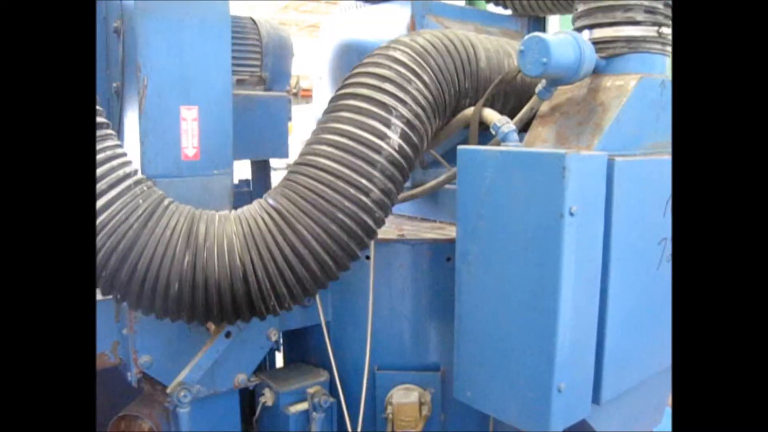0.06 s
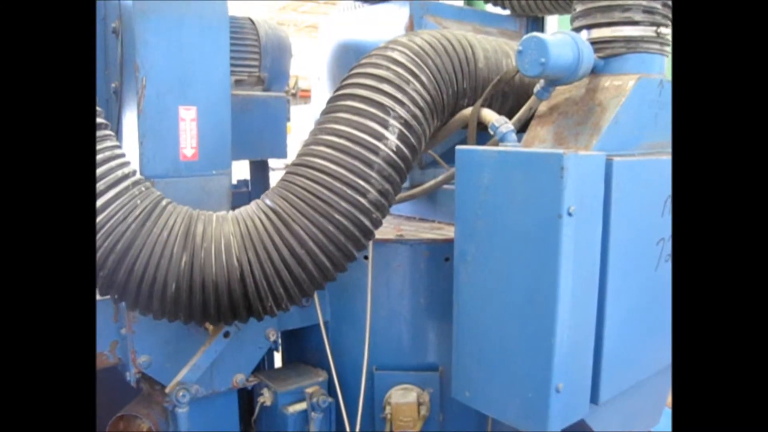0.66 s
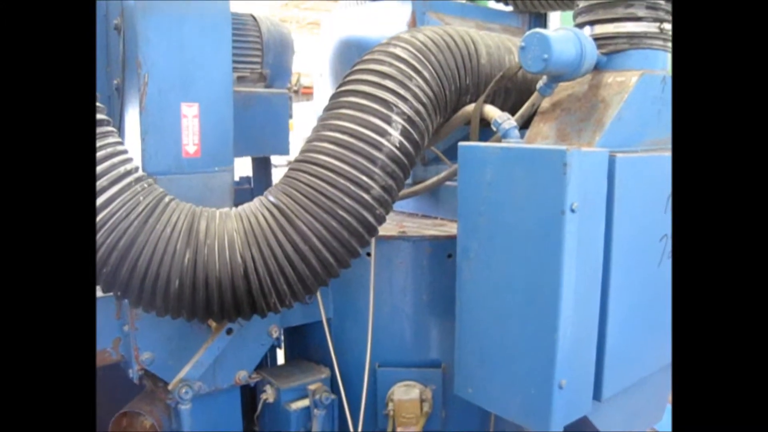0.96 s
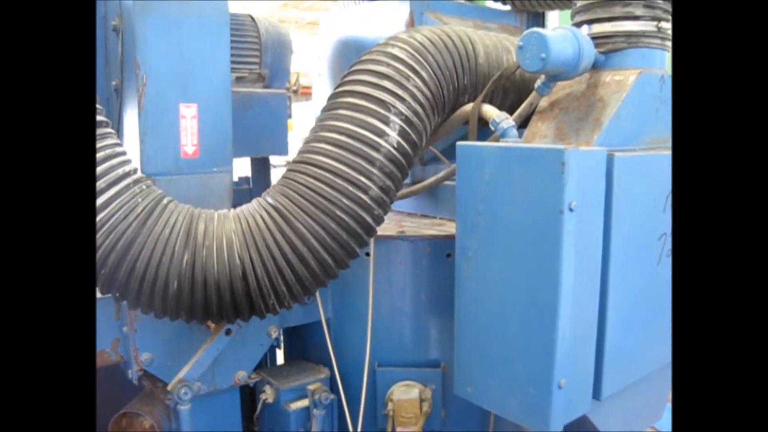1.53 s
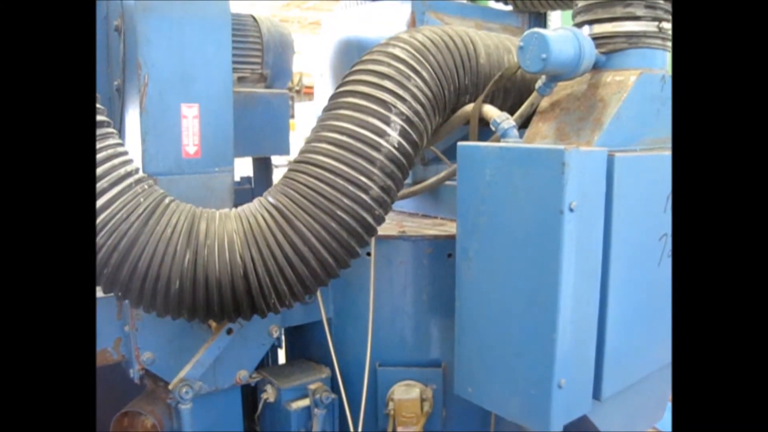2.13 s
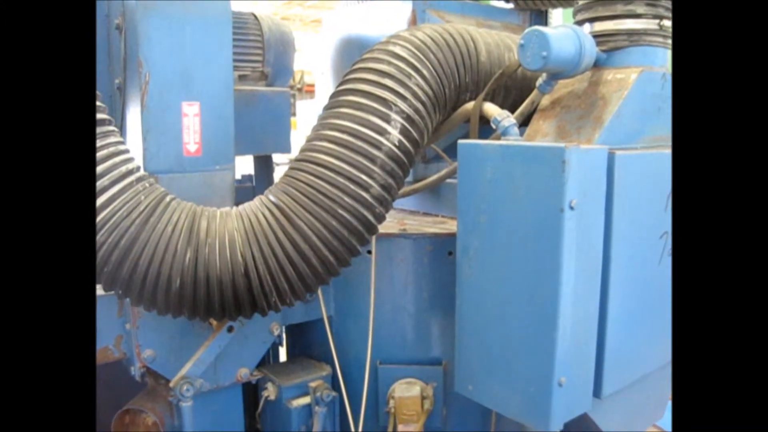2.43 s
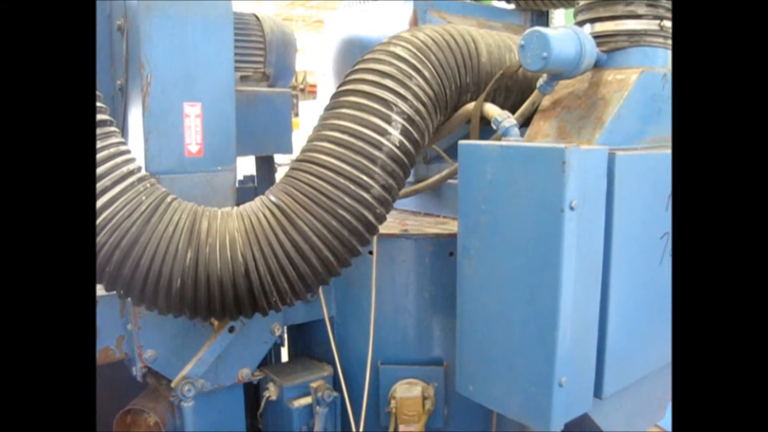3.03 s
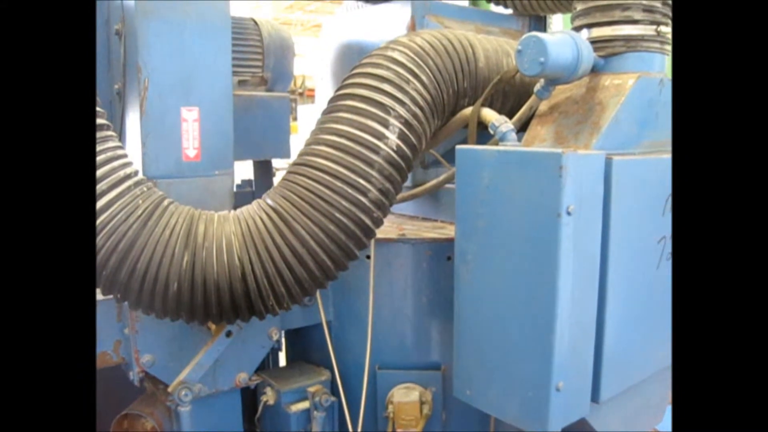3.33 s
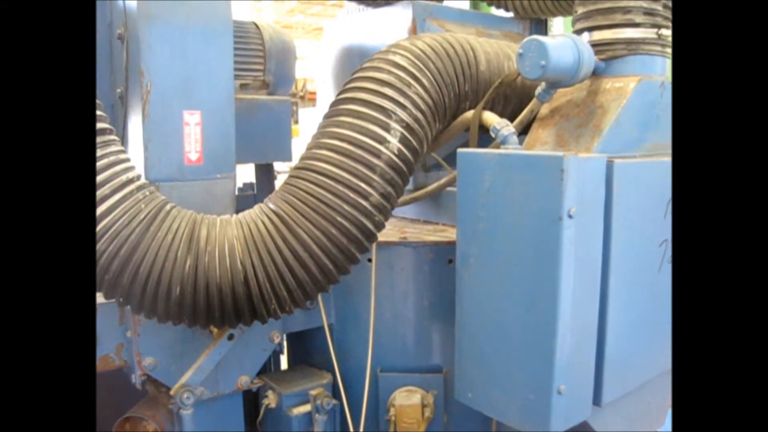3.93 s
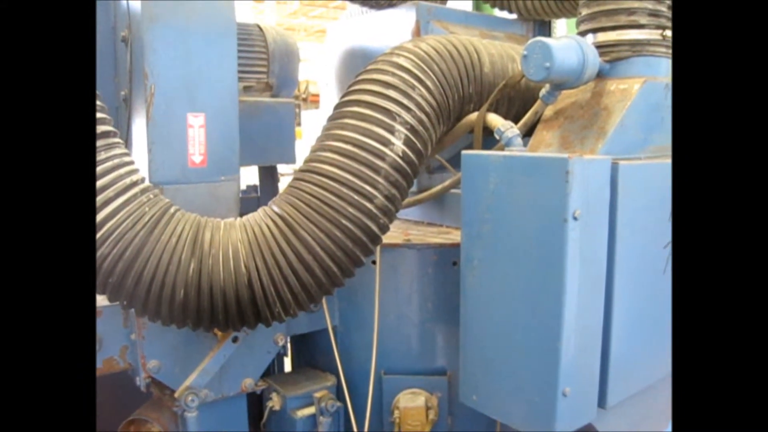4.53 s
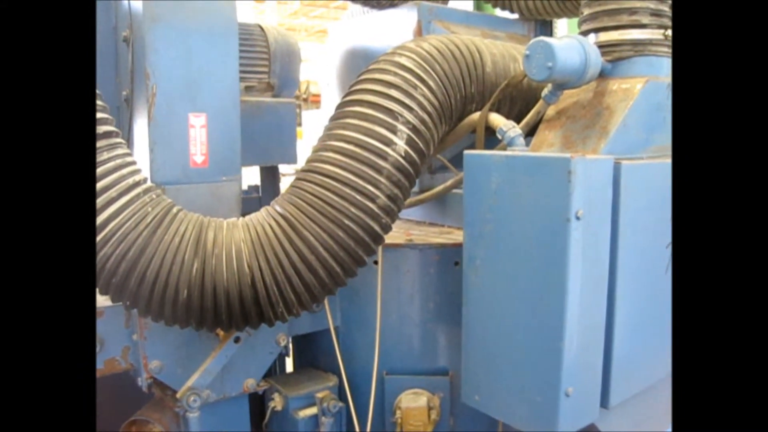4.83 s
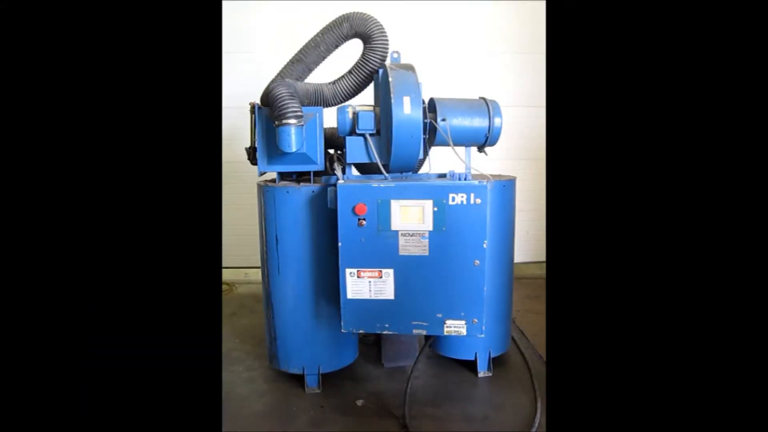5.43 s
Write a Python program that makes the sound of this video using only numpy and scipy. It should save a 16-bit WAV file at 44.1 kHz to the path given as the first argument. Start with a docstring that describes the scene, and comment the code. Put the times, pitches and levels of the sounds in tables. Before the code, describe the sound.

Loud, steady air roar from a plant dryer, booming through a ribbed hose over humming, whining motors, broken by two brief silences.

```python
"""An industrial dryer roars in a plant hall, heard from three standpoints with short silences between.
Its blower drives turbulent air through a ribbed hose that booms at two resonances near 300 and 340 Hz.
In the long middle stretch, beside the hose, the casing rings, motors hum and whine, a thin metallic
singing swells twice, one low gust passes and a faint squeak slides down."""
import sys
import numpy as np
from scipy import signal
from scipy.fft import next_fast_len
from scipy.io import wavfile

SR = 44100
rng = np.random.default_rng(int(sys.argv[2]) if len(sys.argv) > 2 else 0)


def inscribe(sig):
    """Save sig as 16-bit PCM at rate SR to the path in sys.argv[1].

    A 1-D sig is mono; a 2-D sig holds one channel per row.
    Samples are clipped to [-1, 1] before scaling.
    """
    pcm = np.round(np.clip(np.atleast_2d(sig).T, -1, 1) * 32767)
    wavfile.write(sys.argv[1], SR, pcm.astype(np.int16))


N = 245637

# hose resonances: (pitch [Hz], pitch wander [Hz])
LOW_RESONANCE = (303.8, 3.06)
HIGH_RESONANCE = (343, 5.5)
# swells of the metallic singing:
# (crest time [s], hold [s], relative singing level [dB], squeal level [dB], whistle level [dB])
SWELLS = [(1.76, .2, -7, -42, -58.5), (3.971, 0.21, -3, -42, -47.5)]
SWELL_RISE_S, SWELL_FALL_S = .14, .15


def gain_of(db):
    """Decibels to amplitude."""
    return 10 ** (np.asarray(db) / 20)


def seconds():
    """Time of every sample."""
    return np.arange(N) / SR


def follow(rows, column=1):
    """One column of an automation curve at every sample."""
    rows = np.asarray(rows)
    return np.interp(seconds(), rows[:, 0], rows[:, column])


def gate(start, end):
    """Opens and closes within a millisecond."""
    t = seconds()
    return np.sin(np.pi / 2 * np.clip(np.minimum(t - start, end - t) / .001, 0, 1)) ** 2


def envelope(crest_s, hold_s, rise_s, fall_s):
    """Rises smoothly to one at the crest, holds, and dies away."""
    age = seconds() - crest_s
    return np.exp(-(np.minimum(age, 0) / rise_s) ** 2 - (np.maximum(age - hold_s, 0) / fall_s) ** 2)


def swelling_db(rest_db, column):
    """A resting level that rises, in each swell, to the level in the given column."""
    lifts = ((row[column] - rest_db) * envelope(*row[:2], SWELL_RISE_S, SWELL_FALL_S) for row in SWELLS)
    return rest_db + sum(lifts)


def noise(shape):
    """Noise of rms one whose amplitude spectrum follows shape(Hz)."""
    size = next_fast_len(N)
    hz = np.fft.rfftfreq(size, 1 / SR)
    real, imaginary = rng.standard_normal((2, len(hz)))
    sound = np.fft.ifft((real + 1j * imaginary) * shape(hz), size)[:N].real
    return sound / sound.std()


def rush(points):
    """Turbulent noise of rms one, coloured by (Hz, dB) points."""
    pitches, db = np.transpose(points)
    return noise(lambda hz: gain_of(np.interp(np.log(hz + 1), np.log(pitches), db)))


def drift(rate_hz):
    """Smooth random modulation of rms one."""
    return noise(lambda hz: np.exp(-(hz / rate_hz) ** 2))


def ringing(modes):
    """Turbulence ringing in steep-sided resonances."""
    return sum(gain_of(db) * noise(lambda hz: 1 / (1 + ((hz - centre) / width) ** 2))
               for centre, width, db in modes)


def tones(lines, waver_db, waver_hz, wander):
    """Machine tones that waver separately in level and wander together in pitch."""
    clock = np.cumsum(1 + wander * drift(2.48)) / SR
    sound = np.zeros(N)
    for hz, db in lines:
        amplitude = np.sqrt(2) * gain_of(db + waver_db * drift(waver_hz))
        sound += amplitude * np.cos(2 * np.pi * (hz * clock + rng.random()))
    return sound


def panel_air(level_db=-18.5):
    """The dull rush of air at the control panel."""
    # colour of the rush: (frequency [Hz], relative level [dB])
    spectrum = [(25, -17), (110, 1), (350, -4), (600, -12), (1350, -10.5), (1650, -18.5), (2600, -21),
                (4000, -23), (5200, -33), (9000, -42.5), (16000, -56)]
    return gain_of(level_db) * rush(spectrum)


def boom(resonance, level_db, throb_db):
    """The flow sustains a hose resonance, whose pitch wanders and whose level throbs."""
    hz, wander_hz = resonance
    turns = np.cumsum(hz + wander_hz * drift(11.9)) / SR
    return gain_of(level_db + throb_db * drift(17)) * np.sqrt(2) * np.sin(2 * np.pi * turns)


def hose_air(level_db=-22, flutter_db=.33, surge_db=.15, split_hz=3000, hiss_per_flow=.91, lift_db=.2):
    """Roar and hiss surge and flutter with the flow; the hiss lifts a touch with the singing."""
    # colour of the rush beside the hose: (frequency [Hz], relative level [dB])
    spectrum = [(20, -15), (100, -11), (180, -2), (270, 1), (400, 2), (620, -5), (860, 0), (1430, -3),
                (1520, -8), (2700, -12), (4600, -16), (6800, -22.5), (9000, -32), (16000, -47)]
    # strength of the air flow: (time [s], gain [dB])
    flow = [(.2, .2), (.72, -0.3), (1., 2.4), (1.5, -1), (1.78, -0.2), (2.9, -0.76), (3.5, -.5),
            (3.85, 1.2), (4.22, 1.5), (4.55, -0.3), (4.8, 1), (5.2, -0.7)]
    air = gain_of(level_db) * rush(spectrum)
    hiss = signal.sosfiltfilt(signal.butter(2, split_hz, "high", fs=SR, output="sos"), air)
    roar = air - hiss
    flow_db = follow(flow) + surge_db * drift(6.4)
    swell_db = lift_db * sum(envelope(*row[:2], SWELL_RISE_S, SWELL_FALL_S) for row in SWELLS)
    surging = roar * gain_of(flow_db) + hiss * gain_of(hiss_per_flow * flow_db + swell_db)
    return surging * gain_of(flutter_db * drift(25))


def hose_booms(low_db=.5, high_db=-2, dip_hz=3.27, dip_at_s=2.16, dip_db=-10, dip_half_width_s=.042):
    """Both hose resonances throb irregularly; the lower one also ducks at an even rate."""
    # slow level ride of each resonance: (time [s], relative level [dB])
    low_ride = [(.2, -33), (.48, -22.5), (.72, -39), (.83, -26.5), (1.1, -21.5), (1.55, -25.5), (2., -19.5),
                (2.62, -20), (2.95, -22), (3.78, -26), (4., -30), (4.2, -25), (4.78, -22), (5.2, -31)]
    high_ride = [(.2, -26.5), (.8, -30.5), (1.35, -26), (1.5, -35), (1.66, -22), (1.82, -36), (2.4, -24),
                 (2.95, -24), (3.65, -27), (3.8, -22.5), (3.95, -26), (4.4, -27.5), (4.87, -21), (5., -30),
                 (5.1, -17.5), (5.2, -25.5)]
    from_dip_s = (((seconds() - dip_at_s) * dip_hz + .5) % 1 - .5) / dip_hz
    duck_db = dip_db * np.exp(-(from_dip_s / dip_half_width_s) ** 2)
    low = boom(LOW_RESONANCE, follow(low_ride) + duck_db + low_db, throb_db=2)
    high = boom(HIGH_RESONANCE, follow(high_ride) + high_db, throb_db=3)
    return low + high


def casing():
    """Turbulence sets the sheet-metal casing ringing."""
    # casing resonances: (frequency [Hz], half width [Hz], level [dB])
    modes = [(82.4, 9.2, -48), (134, 3.6, -54), (199.8, 12, -36), (229.4, 4.3, -37.5), (273, 4.3, -46),
             (324, 14, -31.5), (416.5, 6, -48.5), (467, 9.9, -38), (621, 5.3, -44.5), (720.6, 22, -34.5),
             (761, 9.8, -37), (1103, 19, -42.5), (1309, 8.7, -42), (1444, 20, -39.5), (1958, 50, -42.5),
             (2595, 220, -42)]
    return ringing(modes)


def motor_hum():
    """Motors and impeller drone; a close pair of tones near 839 Hz beats twice a second."""
    # steady tones: (frequency [Hz], level [dB])
    partials = [(53.8, -47.5), (58.5, -36.5), (116.4, -48.5), (119.8, -43.5), (175, -38.5), (256.4, -38),
                (372.8, -45), (479.8, -40), (537, -46.5), (837.8, -40.5), (839.8, -39), (1074, -41),
                (1171.5, -45.5), (1217.3, -58), (1397, -43), (2126, -46.5)]
    return tones(partials, waver_db=1.5, waver_hz=3.8, wander=.00041)


def whine(motor_hz=4078.5, squeal_hz=4676, whistle_hz=7172):
    """A thin motor whine, with a squeal and a whistle that swell with the singing."""
    # level ride of the motor whine: (time [s], level [dB])
    ride = [(.2, -51), (1.1, -44), (1.5, -58), (2.2, -43.5), (3.6, -43.5), (4.1, -46.5), (4.8, -42),
            (5.2, -46)]
    lines = [(motor_hz, follow(ride)),
             (squeal_hz, swelling_db(rest_db=-56, column=3)),
             (whistle_hz, swelling_db(rest_db=-66, column=4))]
    return tones(lines, waver_db=.7, waver_hz=10, wander=.00022)


def singing(trim_db=3, tones_db=-1.5):
    """High metallic tones and their sizzle swell and fade together."""
    # metallic tones: (frequency [Hz], relative level [dB])
    partials = [(3513, -42.5), (3679, -54.5), (3699, -43), (3746, -52), (4399, -49.5), (4422, -51.5),
                (4468, -52), (4632, -48), (4866, -52), (6029, -48), (6295, -56), (6820, -58), (6935, -55.5),
                (6957, -59), (7171, -56.5), (7241, -52.5), (7402, -62), (7468, -57), (8565, -60)]
    # sizzle bands: (frequency [Hz], half width [Hz], relative level [dB])
    sizzle = [(7040, 640, -43), (8900, 1800, -54)]
    shimmer = gain_of(tones_db) * tones(partials, waver_db=4, waver_hz=30, wander=.0007)
    return gain_of(trim_db + swelling_db(rest_db=-14, column=2)) * (shimmer + ringing(sizzle))


def gust(crest_s=.87, level_db=-26, sag_db_per_s=25):
    """A puff of air buffets the microphone, sags and stops."""
    # colour of the low rumble: (frequency [Hz], relative level [dB])
    spectrum = [(25, -29), (55, 8), (85, -18), (135, 5.5), (220, -12), (600, -63)]
    sag_db = sag_db_per_s * np.maximum(seconds() - crest_s, 0)
    puff = envelope(crest_s, hold_s=.26, rise_s=.04, fall_s=.07)
    return gain_of(level_db - sag_db) * puff * rush(spectrum)


def squeak(trim_db=-4, rough_db=4):
    """A short rough tone that slides down."""
    # falling glide: (time [s], pitch [Hz], relative level [dB])
    glide = [(4.935, 2850, -59), (4.958, 2720, -29), (4.985, 2480, -35), (5.01, 2400, -63)]
    turns = np.cumsum(follow(glide, column=1)) / SR
    level_db = follow(glide, column=2) + trim_db + rough_db * drift(120)
    return gain_of(level_db) * np.sqrt(2) * np.sin(2 * np.pi * turns) * gate(glide[0][0], glide[-1][0])


def front_air(rush_db=-22.5):
    """In front of the machine the air rushes and rings in three low resonances."""
    # colour of the rush: (frequency [Hz], relative level [dB])
    spectrum = [(25, -20.5), (120, -9.5), (175, -0.5), (470, 0), (550, -7), (720, 1.5), (1350, -3),
                (1600, -8), (2300, -8), (3800, -19.5), (6500, -24.5), (10000, -39), (16000, -51)]
    # low resonances: (frequency [Hz], half width [Hz], level [dB])
    modes = [(174.2, 5.2, -30), (310, 4.5, -28.5), (341.5, 7.6, -26.5)]
    return gain_of(rush_db) * rush(spectrum) + ringing(modes)


def scene(front_hum_db=-4):
    """The dryer from the control panel, beside the hose and from the front, in turn."""
    # when each standpoint is heard: (start [s], end [s])
    spans = [(0, .0455), (.1839, 5.2153), (5.3558, 5.6)]
    hum = motor_hum()
    at_panel = panel_air() + boom(LOW_RESONANCE, level_db=-25.5, throb_db=3)
    at_hose = hose_air() + hose_booms() + casing() + hum + whine() + singing() + squeak() + gust()
    in_front = front_air() + gain_of(front_hum_db) * hum
    return sum(sound * gate(*span) for sound, span in zip([at_panel, at_hose, in_front], spans))[None]


def record(dry, cutoff_hz=15800):
    """A steep low-pass trims the very top of the hiss."""
    low_pass = signal.firwin(511, cutoff_hz, window=("kaiser", 9), fs=SR)
    return signal.oaconvolve(dry, low_pass[None], "same")


dry = scene()
out = record(dry)
inscribe(out)
```